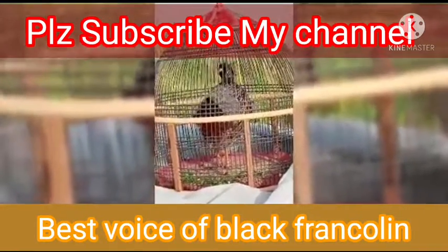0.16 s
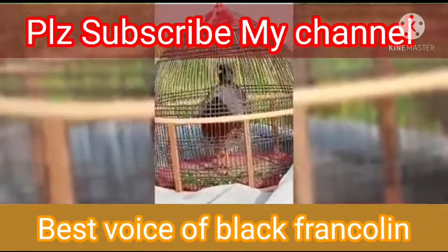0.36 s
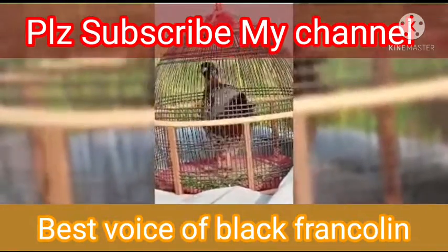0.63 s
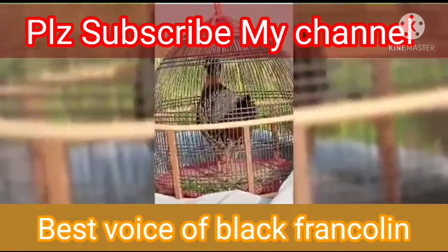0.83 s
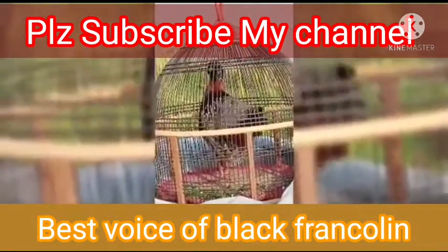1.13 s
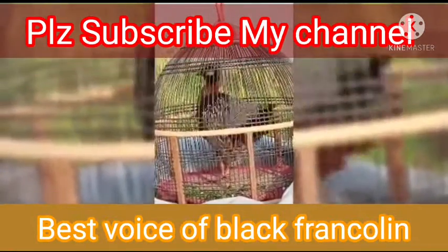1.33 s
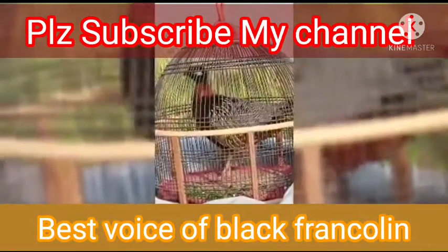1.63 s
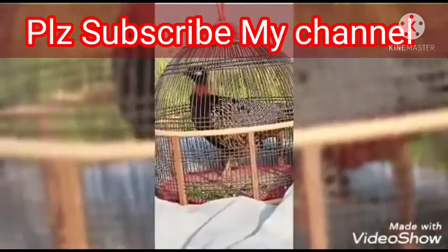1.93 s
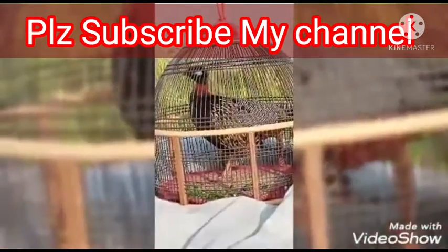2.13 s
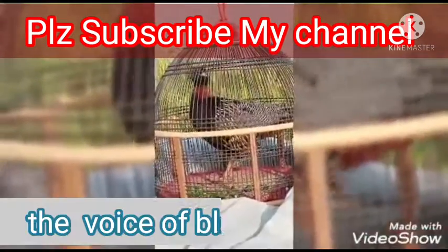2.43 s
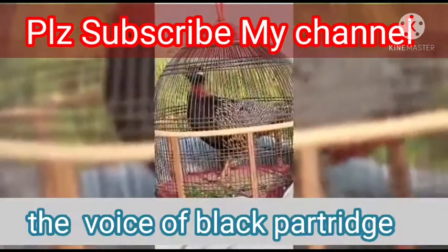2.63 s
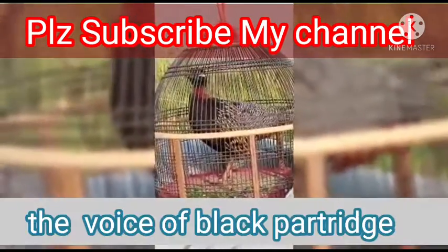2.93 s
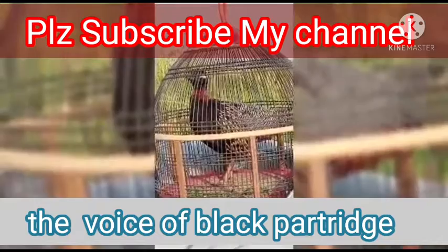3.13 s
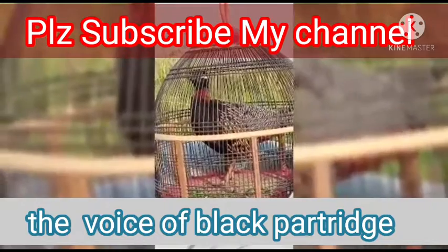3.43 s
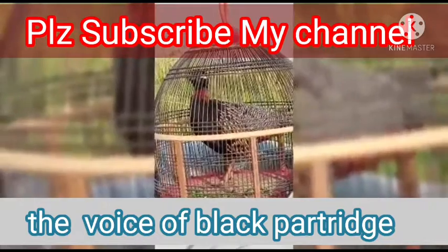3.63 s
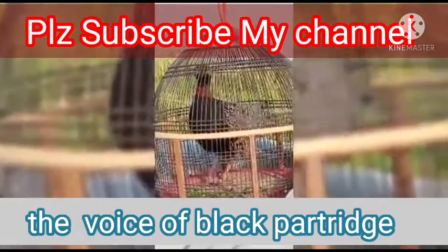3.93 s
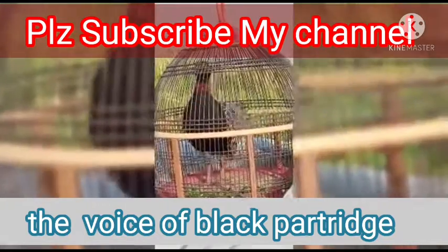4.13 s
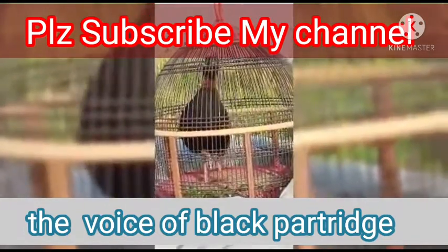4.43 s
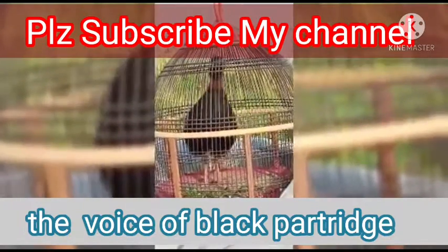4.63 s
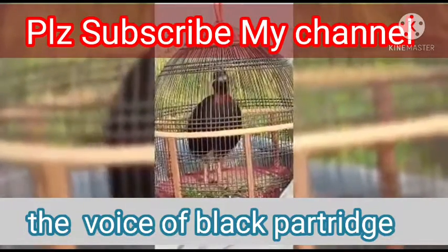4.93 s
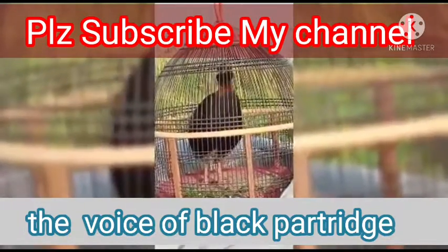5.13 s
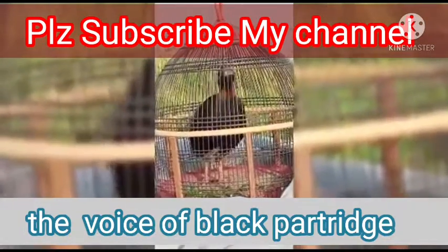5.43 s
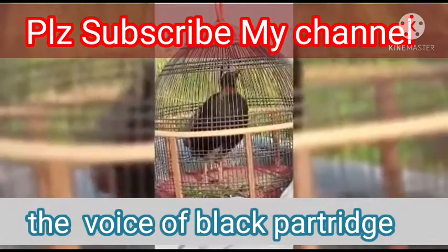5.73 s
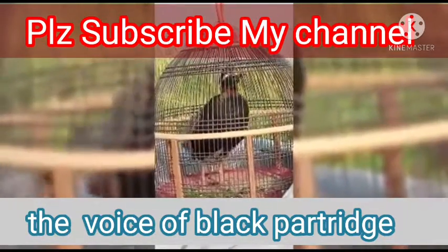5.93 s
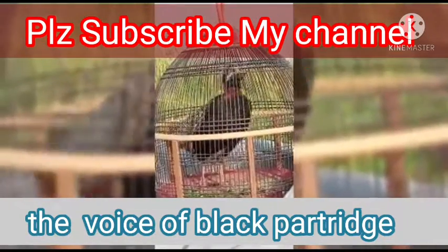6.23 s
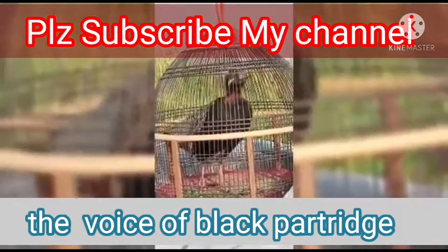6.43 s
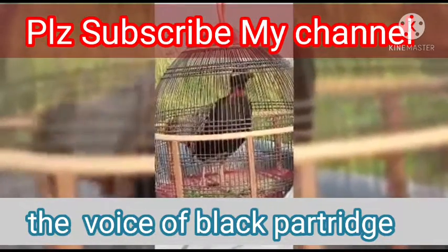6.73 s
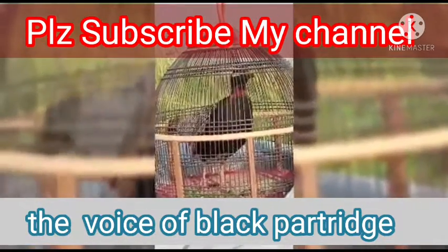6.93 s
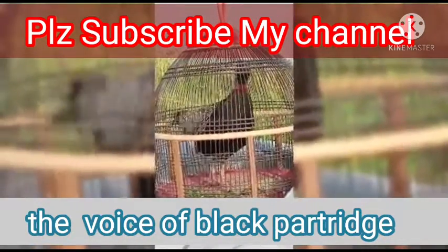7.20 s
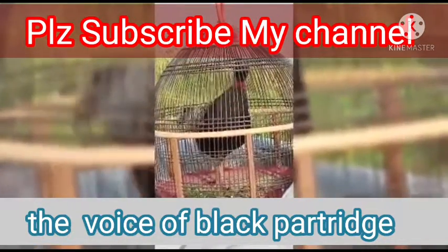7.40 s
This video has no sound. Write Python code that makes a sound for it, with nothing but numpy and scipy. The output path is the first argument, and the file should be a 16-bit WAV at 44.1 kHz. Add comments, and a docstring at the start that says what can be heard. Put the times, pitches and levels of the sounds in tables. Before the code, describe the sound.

Outdoors, small birds peep and chirp faintly over the low hum of a far, fading engine, and a cage ticks lightly now and then. After several quiet seconds, a francolin right by the microphone breaks in with a squeaky hiccup and two pairs of loud, rasping notes, twice cracking into a squeak, with almost no echo. Then a distant songbird softly sings two brief falling phrases.

```python
"""First comes the low rumble and hum of a far engine in outdoor air, then faint chirps, peeps and cage taps.
About five seconds in, a caged black francolin calls once, close by: a squeaky hiccup, then four harsh
grating notes. A slow flutter chops the whistle of its voice box (the syrinx) into bursts that ring the
throat; twice the voice breaks into a squeak. A distant songbird ends with two short phrases."""
import sys
import numpy as np
from scipy import signal
from scipy.fft import rfft, irfft
from scipy.io import wavfile
from scipy.ndimage import uniform_filter1d, minimum_filter1d

SR = 44100
rng = np.random.default_rng(int(sys.argv[2]) if len(sys.argv) > 2 else 0)


def store_wav(level_fs):
    """Save 16-bit WAV to argv[1]."""
    pcm = np.round(np.clip(np.atleast_2d(level_fs), -1, 1) * 32767)
    wavfile.write(sys.argv[1], SR, pcm.T.astype(np.int16))


N = 333396
T = np.arange(N) / SR
HZ = np.maximum(np.arange(N // 2 + 1) * SR / N, 1)

# how strong the outdoor air is from bass to treble: f/Hz, relative level/dB
AIR_SPECTRUM = [(15, -41.5), (28, -23), (50, -4), (95, 1), (140, -3.5), (200, -1), (285, -9.5),
                (394, -12.5), (659, -12.5), (911, -19), (1740, -22), (3620, -24.5), (5140, -38.5),
                (8140, -36.5), (9840, -41.5), (14800, -39), (16000, -45)]
# how the far engine's hum swells and fades: t/s, relative level/dB
HUM_SWELL = [(0, -64), (.35, -63), (1.05, -69), (1.45, -75), (2.2, -72.5), (2.6, -66), (3.7, -73),
             (5.3, -83), (6.15, -65.5), (7.5, -83.5)]
# single sliding notes of far songbirds, and at 2.525 s a chip after the small bird's last peep: t/s, length/s,
# middle f/Hz, slide/octaves, level/dB
SONGBIRD_CHIRPS = [(.58, .045, 3280, -0.32, -73), (0.888, 0.051, 2860, -0.25, -71),
                   (.999, .022, 3650, -.18, -73.5), (2.104, 0.053, 3600, -.19, -78.5),
                   (2.18, .033, 2940, -.08, -78), (2.525, .021, 3010, .02, -78),
                   (4.03, .014, 3600, -.25, -66.5), (4.351, 0.043, 2820, -0.19, -69),
                   (6.174, 0.04, 3132, 0.043, -71.5), (6.678, .054, 3297, .04, -74.5),
                   (7.208, 0.053, 3080, .06, -74.5)]
# small taps on the cage: t/s, f/Hz, width/Hz, level/dB
CAGE_TAPS = [(0.8257, 1430, 600, -38), (2.29, 8000, 2000, -58), (2.815, 8000, 2500, -58),
             (3.086, 8600, 2200, -47.5)]
# a small bird's thin peeps: t/s, top f/Hz of the lowest partial, level/dB
BIRD_PEEPS = [(.916, 2100, -73), (1.121, 2120, -73.5), (1.334, 2065, -75), (1.543, 2085, -74.5),
              (1.759, 2130, -76), (1.980, 2055, -77), (2.228, 2050, -82), (2.46, 2050, -84)]
# hiccup squeaks: t/s, length/s, start f/Hz, middle f/Hz, end f/Hz, level/dB, swell/dB, overtone/dB
HICCUP_SQUEAKS = [(4.948, 0.015, 3700, 3850, 3430, -22, 16, -1.5),
                  (4.9622, 0.015, 2508, 2508, 2435, -11.5, 8.5, -28.5),
                  (4.976, .012, 1765, 1680, 1700, -27.5, 0, -15),
                  (4.986, .035, 6480, 6690, 6280, -25, -1, -2),
                  (5.023, .011, 1720, 1700, 1660, -36, -16, -10)]
# pops as the voice flips between registers: t/s, crack level/dB, flick level/dB, thump level/dB
VOICE_POPS = [(4.961, -25, -35, -50), (4.9744, -20.5, -28, -42), (4.986, -18, -18, -29.5),
              (5.0213, -17, -9, -11)]
# where the throat and beak ring: f/Hz, width/Hz, level/dB
THROAT_PEAKS = [(1680, 150, -23.5), (2460, 200, -19.5), (2962, 340, 2.5), (3520, 790, -2), (4285, 750, -5),
                (5072, 640, -6.5), (5770, 330, -12), (7610, 1000, -12), (8702, 974, -4), (9800, 700, -17),
                (11550, 770, -26.5), (13070, 900, -34.5), (15250, 600, -24.5)]
# narrow dips between those peaks: f/Hz, width/Hz, level/dB
THROAT_DIPS = [(2790, 190, -14.5), (3310, 160, -3), (4350, 96, -5), (5070, 130, -8), (6650, 210, -7),
               (8750, 220, -8), (9600, 140, -21), (11180, 340, -9)]
# clicks of the beak parting: t/s, level/dB
BEAK_CLICKS = [(5.42, -55), (6.424, -54.5)]
# grating notes, each strongest at its crest: start t/s, end t/s, crest t/s, crest f/Hz,
# pitch sag off the crest (0-1), slide-in/s, level/dB, fade off the crest/dB, crest roughness (0-1)
GRATING_NOTES = [(5.43, 5.612, 5.525, 3063, .04, .006, -15.5, -1.5, .27),
                 (5.755, 6.014, 5.834, 3100, .19, .023, -15.5, -3, .2),
                 (6.266, 6.378, 6.325, 3070, .15, .024, -16, -5.5, .33),
                 (6.43, 6.601, 6.498, 3080, 0.14, .021, -16.5, -3.5, 0.29)]
# the grating breaks into a high squeak: middle t/s, length/s, top f/Hz, level/dB
VOICE_BREAKS = [(5.9669, .018, 6830, -29.5), (6.5145, .012, 6980, -19.5)]
# a songbird's phrases: t/s, whistle f/Hz, whistle level/dB, first run note f/Hz, run level/dB
SONG_PHRASES = [(6.810, 3850, -75, 2917, -68.5), (7.356, 3710, -81.5, 2780, -71.5)]


def undb(db):
    """Turn decibels into a number to multiply by."""
    return 10 ** (np.asarray(db) / 20)


def unit(x):
    """Scale a sound to an average power of 1."""
    return x / np.sqrt(np.mean(x ** 2))


def wander(rate, size=N):
    """A smooth random drift of about 1 that turns `rate` times a second."""
    k = max(int(SR / rate), 1)
    return unit(uniform_filter1d(np.repeat(rng.standard_normal(size // k + 2), k), k))[:size]


def bell(middle, width):
    """A smooth bump in time, 1 at its middle."""
    return np.exp(-((T - middle) / width) ** 2)


def resonance(hz, width):
    """A filter that favours one band of frequencies."""
    return 1 / (1 + ((HZ ** 2 - hz ** 2) / (HZ * width)) ** 2)


def ringing(gain):
    """Make a filter of power 1 that rings only after it is struck."""
    cepstrum = irfft(np.log(unit(gain) + 1e-9), N)
    cepstrum[1:N // 2] *= 2
    cepstrum[N // 2 + 1:] = 0
    return np.exp(rfft(cepstrum))


def colour(x, response):
    """Pass a sound through a filter."""
    return irfft(rfft(x) * response, N)


def add(out, start, x):
    """Mix a sound in at its time."""
    i = min(int(start * SR), len(out))
    out[i:i + len(x)] += x[:len(out) - i]


def air_and_engine(air_db=-67, rumble_db=-68.5, fade_db_per_s=2.5):
    """Steady outdoor air and an engine moving away, whose rumble partly follows its hum."""
    hz, db = np.transpose(AIR_SPECTRUM)
    shape = undb(np.interp(np.log(HZ), np.log(hz), db))
    air = unit(colour(rng.standard_normal(N), shape)) * undb(air_db + .7 * wander(4.7))
    swell_db = np.interp(T, *np.transpose(HUM_SWELL))
    far_db = rumble_db - fade_db_per_s * T + .52 * (swell_db - swell_db.max())
    rumble = unit(colour(rng.standard_normal(N), shape * resonance(200, 900)))
    return air + rumble * undb(far_db + 1.2 * wander(9)) + engine_hum(swell_db)


def engine_hum(swell_db, hum_hz=283.2, whirr_hz=684, whirr_db=-72):
    """The engine hums at five times its firing rate; a brief whirr throbs with each firing."""
    firing = 2 * np.pi * np.cumsum(hum_hz / 5 * (1 + .0021 * wander(7.1))) / SR
    hum = np.sin(5 * firing) + .51 * np.sin(4 * firing) + .3 * np.sin(3 * firing) + .4 * np.sin(2 * firing)
    strokes = unit(np.diff(firing // (2 * np.pi), prepend=0))
    gas = undb(-7) * rng.standard_normal(N) * (1 + .44 * np.cos(firing))
    whirr = unit(colour(strokes + gas, ringing(resonance(whirr_hz, 220)))) * bell(0, .47)
    return np.sqrt(2) * hum * undb(swell_db - 4 + 1.5 * wander(9.7)) + whirr * undb(whirr_db)


def whistle(length, pitches, partials_db, swell_db, waver, edge, breath_db=-40):
    """A breathy, quivering tone that bends through three pitches; `edge` is the share spent fading."""
    progress = np.linspace(0, 1, int(length * SR))
    size = len(progress)
    arch_hz = np.polyval(np.polyfit([0, .5, 1], pitches, 2), progress)
    phase = 2 * np.pi * np.cumsum(arch_hz * (1 + waver * wander(820, size))) / SR
    tone = sum(undb(db) * np.sin(k * phase)
               for k, db in enumerate(partials_db, 1) if k * max(pitches) < SR / 2)
    breath = undb(breath_db) * rng.standard_normal(size)
    loudness = undb(swell_db * (progress - .5)) * signal.windows.tukey(size, np.clip(edge, 0, 1))
    return np.sqrt(2) * (tone + breath) * loudness


def chirp(length, pitches):
    """One quivering note of a small bird."""
    return whistle(length, pitches, [0], -2, waver=.018, edge=.56)


def songbird_chirps():
    """Far songbirds whistle single notes that slide up or down; one more chip follows the small bird's last
    peep."""
    out = np.zeros(N)
    for start, length, hz, octaves, db in SONGBIRD_CHIRPS:
        add(out, start, undb(db) * chirp(length, hz * 2 ** (octaves * np.array([-.5, 0, .5]))))
    return out


def cage_taps():
    """The cage rings briefly as the francolin shifts on its feet."""
    return sum(colour(undb(db) * signal.unit_impulse(N, int(start * SR)), ringing(resonance(hz, width)))
               for start, hz, width, db in CAGE_TAPS)


def peeps(length_s=.06, chip_lag_s=.064, chip_hz=(2760, 2940, 2970)):
    """A small bird whistles thin peeps, each ending in a downward flick and a short chip."""
    out = np.zeros(N)
    for start, hz, db in BIRD_PEEPS:
        pitches = hz * np.array([.945, 1, .95])
        peep = whistle(length_s, pitches, [-12, -2, -10.5, -14, -25], 4, waver=.0027, edge=.45)
        add(out, start, undb(db) * peep)
        fall_hz = 2 * pitches[-1] * np.array([1, .94, .82])  # falls from the loud second partial
        flick = whistle(.014, fall_hz, [0], -4, waver=.01, edge=.38)
        add(out, start + .88 * length_s, undb(db - 7) * flick)
        add(out, start + chip_lag_s, undb(db - 1.5) * chirp(.022, chip_hz))
    return out


def squeak(length, pitches, swell_db=0, overtone_db=-28, fades_s=.0064):
    """One note in the francolin's clear, high voice."""
    partials_db = [0, overtone_db, -27, -27]
    return whistle(length, pitches, partials_db, swell_db, .0045, edge=fades_s / length, breath_db=-28.5)


def hiccup():
    """The call opens with quick squeaks that leap between pitches."""
    out = np.zeros(N)
    for start, length, *pitches, db, swell_db, overtone_db in HICCUP_SQUEAKS:
        add(out, start, undb(db) * squeak(length, pitches, swell_db, overtone_db))
    return out


def throat_filter(leak_db=-42, beak_hz=350):
    """The throat rings at its peaks and leaks a little elsewhere; the small beak gives little bass."""
    peak_power = sum((undb(db) * resonance(hz, width)) ** 2 for hz, width, db in THROAT_PEAKS)
    dips = undb(sum(db * resonance(hz, width) for hz, width, db in THROAT_DIPS))
    return ringing(np.sqrt(undb(leak_db) ** 2 + peak_power) * dips * HZ / np.hypot(HZ, beak_hz))


def puff(middle, db, width_s):
    """A tiny burst of noise."""
    return undb(db) * bell(middle, np.sqrt(2) * width_s) * rng.standard_normal(N)


def voice_pops(throat, rattle_s=.004, flick_s=.0014, flick_hz=(8900, 8650, 7400)):
    """Each flip of register gives a crack, a trailing rattle, a bright flick and a thump of air."""
    cracks, flicks, thumps = np.zeros((3, N))
    for start, db, flick_db, thump_db in VOICE_POPS:
        cracks += puff(start, db, width_s=.0011)
        rattle_fade = (T > start) * np.exp(-np.abs(T - start) / rattle_s)
        cracks += undb(db - 2.5) * rattle_fade * rng.standard_normal(N)
        add(flicks, start - flick_s / 2, undb(flick_db) * squeak(flick_s, flick_hz))
        add(thumps, start, undb([thump_db]))
    return colour(cracks, throat) + flicks + colour(thumps, ringing(resonance(190, 650)))


def beak_clicks(throat):
    """The beak parts with a faint click before two of the notes."""
    return colour(sum(puff(time, db, width_s=.00082) for time, db in BEAK_CLICKS), throat)


def effort(slack_hz=1380, slack_db=-7, slack_rough=.88, crest_flutter_hz=282.5):
    """Each grating note is one push: the harder it is, the higher, louder and cleaner the voice."""
    whistle_hz, flutter_hz, db, rough, gate = np.outer([slack_hz, crest_flutter_hz, 0, 1, 0], np.ones(N))
    attack_s, release_s, slide_out_s, crest_s = .011, .016, .022, .075
    for start, end, crest, top_hz, sag, slide_s, top_db, fade_db, top_rough in GRATING_NOTES:
        on = (T > start) & (T < end)
        ending = bell(end, slide_out_s)[on]
        off_crest = 1 - bell(crest, crest_s)[on]
        push = (1 - bell(start, slide_s)[on]) * (1 - ending)
        whistle_hz[on] = slack_hz + push * (top_hz * (1 - sag * off_crest) - slack_hz)
        flutter_hz[on] = crest_flutter_hz * (1 - .4 * sag * off_crest) * (1 - .15 * ending)
        db[on] = top_db + fade_db * off_crest + slack_db * (1 - push)
        rough[on] = slack_rough + (top_rough - slack_rough) * push * (1 - off_crest ** 2)
        gate[on] = np.minimum(1, np.minimum((T[on] - start) / attack_s, (end - T[on]) / release_s)) ** 2
    for middle, length, _, _ in VOICE_BREAKS:  # the grating dips and roughens at each break
        gate *= undb(-26 * bell(middle, .49 * length) ** 2)
        rough += (slack_rough - rough) * bell(middle, length)
    return whistle_hz, flutter_hz, db, np.clip(rough, 0, 1), gate


def smear(depth=2.0, span_hz=520):
    """Many short paths make each band of the sound arrive slightly early or late."""
    knots_hz = np.arange(0, SR, span_hz)
    phase = np.interp(HZ, knots_hz, depth * rng.standard_normal(400)[:len(knots_hz)])
    return np.exp(1j * uniform_filter1d(phase, size=2000))


def grating(throat, weak_db=-4.5, half_open_hz=7950, wide_open_hz=8950):
    """The voice box opens twice per flutter, strong then weak, each time letting out a burst of whistle."""
    whistle_hz, flutter_hz, db, rough, gate = effort()
    # the flutter drifts, and single openings come early or late
    drift = np.exp(.06 * rough * wander(150) + .025 * wander(30))
    steady_cycle = np.cumsum(2 * flutter_hz * drift) / SR
    cycle = np.maximum.accumulate(np.abs(steady_cycle + .16 * rough * wander(500)))
    count = cycle.astype(int)
    strength = undb(weak_db * (count % 2) + 2 * rough * rng.standard_normal(N)[count])
    pulses = unit(np.diff(count, prepend=0) * strength)
    opening = unit(strength * np.exp(-(cycle % 1) / .9))
    quiver = 1 + .012 * wander(45) + .09 * rough ** 2 * wander(1200)
    phase = 2 * np.pi * np.cumsum(whistle_hz * quiver) / SR
    # bursts stay in step with the whistle, so evenly spaced tones line up around it
    burst_spectrum = rfft(pulses * np.cos(phase)) + 1j * rfft(pulses * np.sin(phase))
    bursts = irfft(burst_spectrum * throat * smear(), N)
    air_rush = colour(opening * rng.standard_normal(N), throat)
    air_share = .87 * rough
    grate = np.sqrt(1 - air_share) * bursts + np.sqrt(air_share) * air_rush
    # the beak opens towards the crest and moves the high ring upwards
    lift = colour(grate, resonance(wide_open_hz, 600) - resonance(half_open_hz, 600))
    grate += 1.1 * (.5 - rough) * lift
    # at the top of a note the whistle's third partial meets that ring
    third = colour(opening * np.sin(3 * phase + 2.1 * wander(700)), throat) * (1 - rough) * undb(-19)
    # the hoarse whistle stands out as a note slides in and out
    hoarse = unit(strength * np.sin(phase + .75 * wander(900))) * rough * undb(-34)
    # the flutter itself is a weak thrum inside a low growl
    flutter = np.sin(np.pi * steady_cycle + .5 * wander(300)) + .55 * np.sin(2 * np.pi * steady_cycle)
    thrum = unit(flutter) * undb(-33) * (1 - rough / 2)
    growl = unit(colour(opening * rng.standard_normal(N), resonance(300, 800))) * undb(-37)
    return gate * (undb(db) * (grate + third + thrum + growl) + hoarse)


def voice_breaks():
    """The grating voice cracks into a high, arched squeak."""
    out = np.zeros(N)
    for middle, length, hz, db in VOICE_BREAKS:
        pitches = hz * np.array([.923, 1, .923])
        add(out, middle - length / 2, undb(db) * squeak(length, pitches, overtone_db=-11.5))
    return out


def song_phrases(lead_s=.06, plunge_s=.014, note_s=.03054, spacing_s=.035):
    """A far songbird holds a whistle, then plunges into a run of four notes, each lower and softer."""
    out = np.zeros(N)
    for start, lead_hz, lead_db, run_hz, run_db in SONG_PHRASES:
        held_hz = lead_hz * np.array([.99, .98, .965])
        add(out, start, undb(lead_db) * chirp(lead_s - plunge_s / 2, held_hz))
        plunge = chirp(plunge_s, [held_hz[-1], (2 * lead_hz + run_hz) / 3, run_hz])
        add(out, start + lead_s - plunge_s, undb(lead_db - 2) * plunge)
        for k in range(4):
            bend = np.array([.8, .98, 1]) if k else np.ones(3)  # the first is level; the rest hook up
            note = whistle(note_s, run_hz * .95 ** k * bend, [0], 0, waver=.012, edge=.35)
            add(out, start + lead_s + k * spacing_s, undb(run_db - 2 * k) * note)
    return out


def yard(x, echo_db, echo_s, build_s=.0087):
    """The ground and things nearby scatter back a weak echo that falls 60 dB in `echo_s`."""
    t = T[:SR // 2]
    tail = rng.standard_normal(len(t)) * undb(-60 * t / echo_s) * (1 - np.exp(-(t / build_s) ** 2))
    return x + undb(echo_db) * signal.fftconvolve(x, tail / np.sqrt(np.sum(tail ** 2)))[:N]


def scene():
    """The francolin and its cage close by, everything else far behind."""
    throat = throat_filter()
    francolin = grating(throat) + beak_clicks(throat) + voice_pops(throat) + hiccup() + voice_breaks()
    near = yard(francolin + cage_taps(), echo_db=-33.5, echo_s=.16)
    far = yard(peeps() + songbird_chirps() + song_phrases(), echo_db=-14, echo_s=.28)
    return (near + far + air_and_engine())[None]


def record(dry, ceiling=.61, low_hz=38, top_hz=15750):
    """Quickly turn down the highest peaks, then cut the deepest bass and the highest treble."""
    gain = minimum_filter1d(np.minimum(1, ceiling / (np.abs(dry) + 1e-9)), size=220)
    x = dry * uniform_filter1d(gain, size=220)
    x = signal.sosfilt(signal.butter(2, low_hz, "high", fs=SR, output="sos"), x)
    return signal.sosfilt(signal.ellip(10, .2, 70, top_hz, fs=SR, output="sos"), x)


dry = scene()
out = record(dry)
store_wav(out)
```